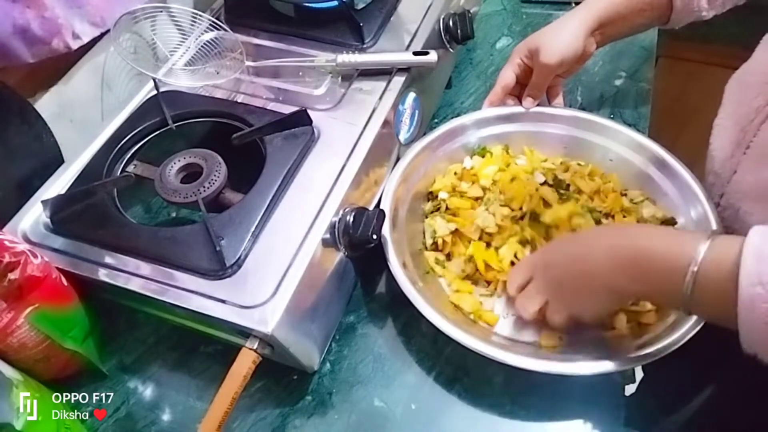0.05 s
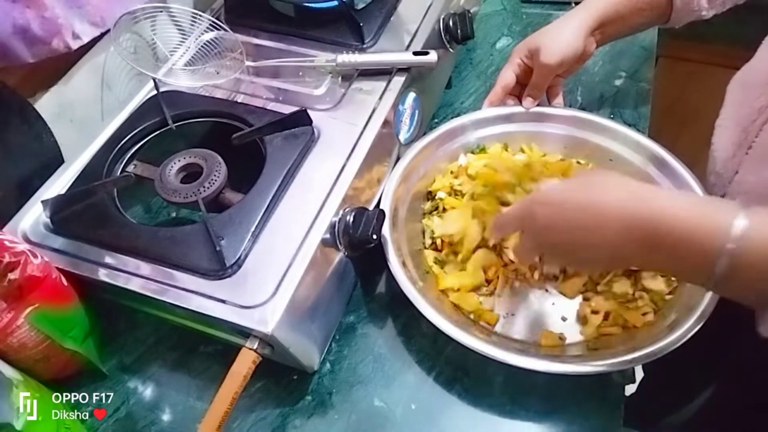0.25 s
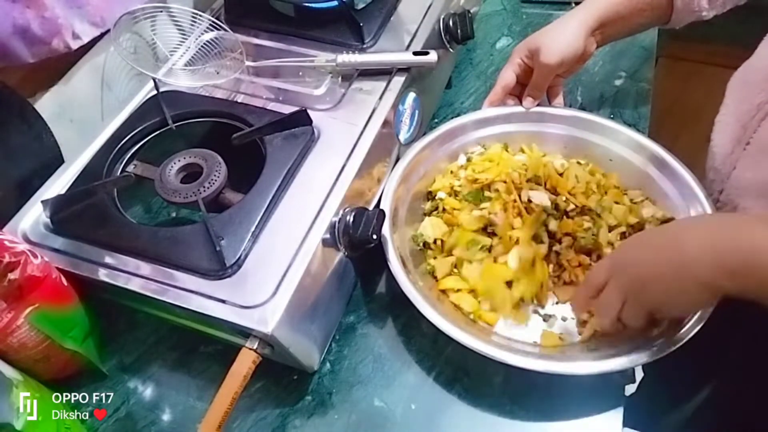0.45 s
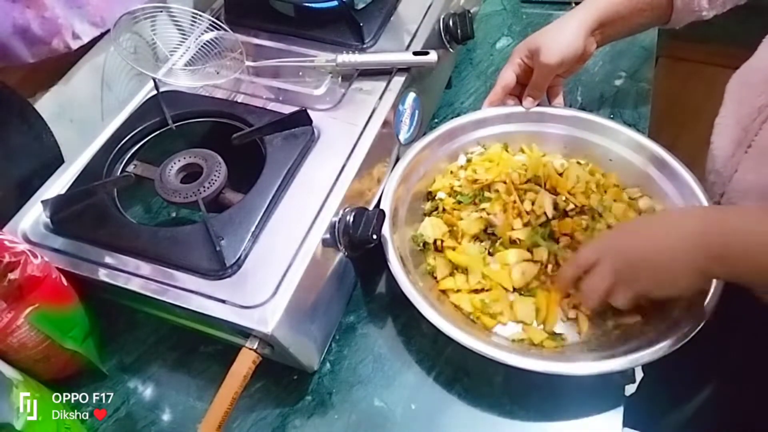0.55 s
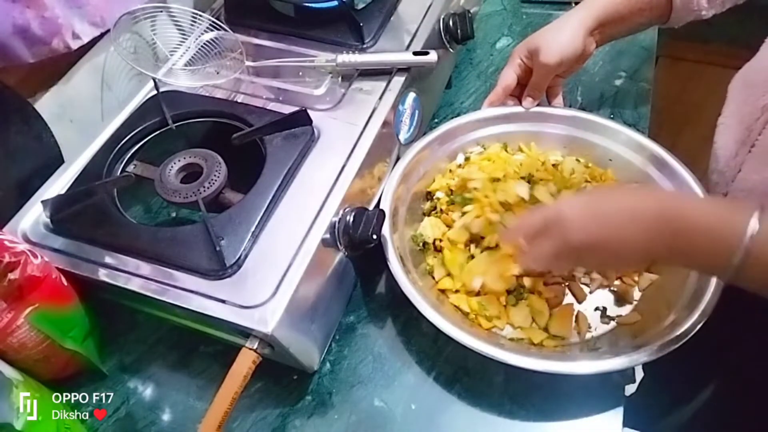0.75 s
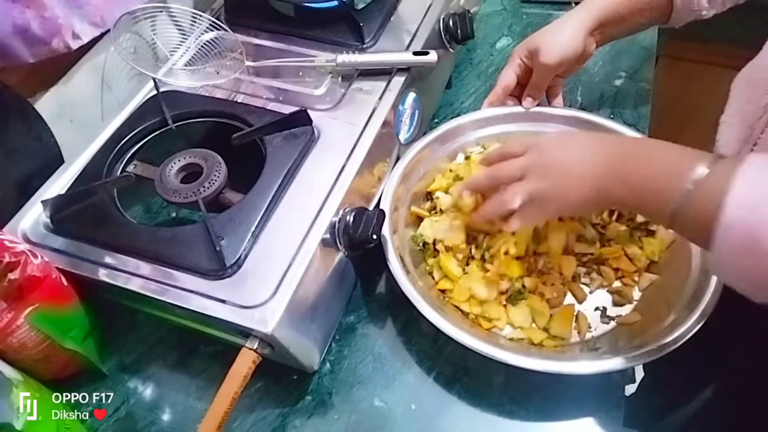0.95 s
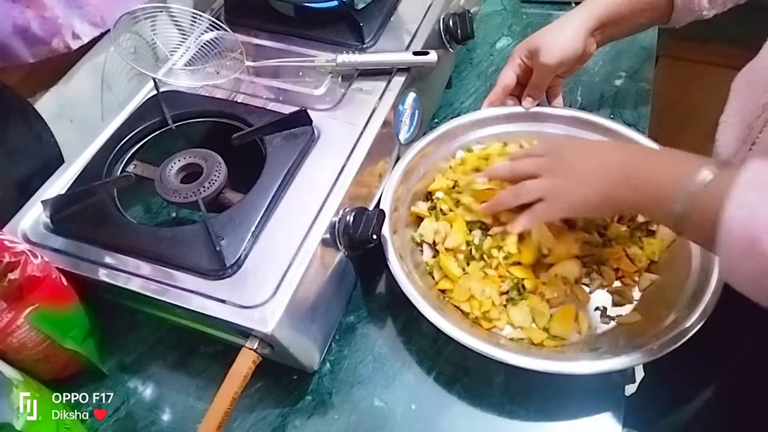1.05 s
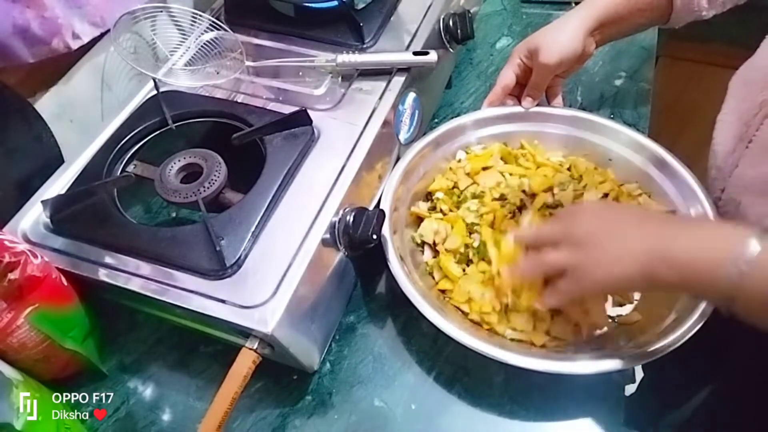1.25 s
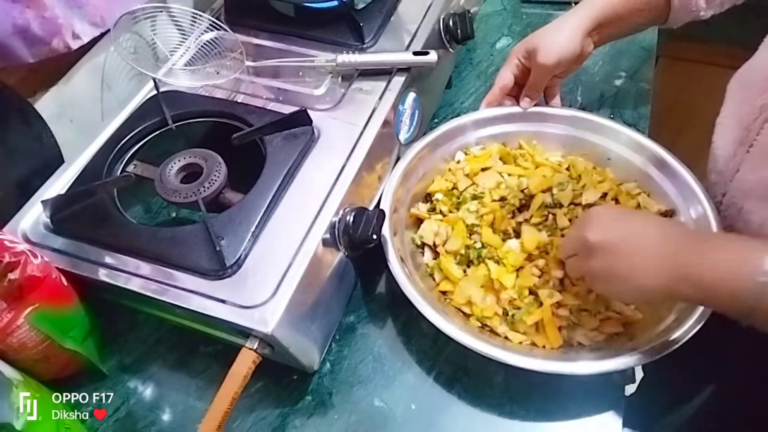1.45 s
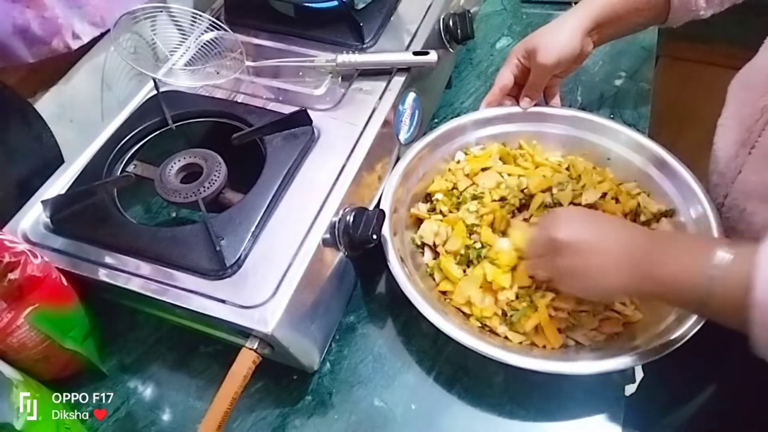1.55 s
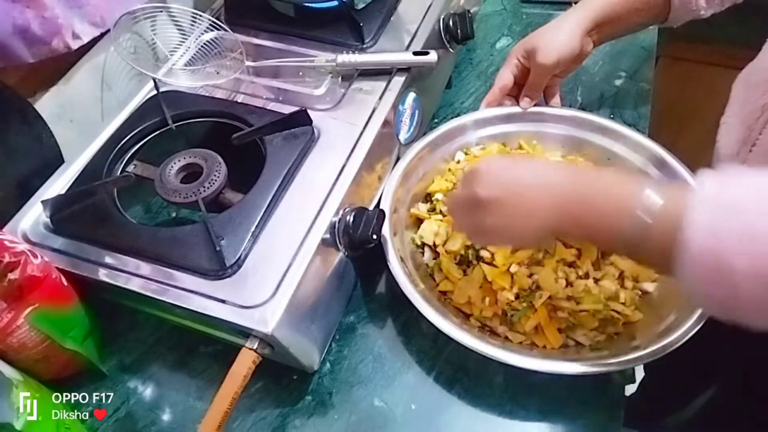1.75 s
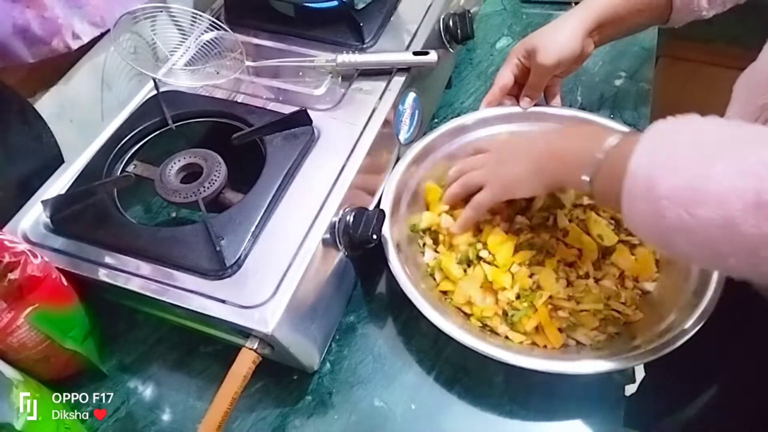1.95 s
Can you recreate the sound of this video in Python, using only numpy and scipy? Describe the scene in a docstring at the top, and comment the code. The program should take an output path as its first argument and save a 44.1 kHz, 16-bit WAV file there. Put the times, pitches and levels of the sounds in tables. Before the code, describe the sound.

Crisp chopped vegetables rustle, crunch and snap as a hand mixes them in a steel bowl. Fingers knock the bowl, which rings briefly and rumbles on the counter, close to the microphone in a small kitchen.

```python
"""On a kitchen counter, close to a phone, a hand turns crisp chopped vegetables in a wide steel bowl.
The pieces rustle as they slide, crunch when crushed or dropped, and now and then snap.
Fingers knock the loaded bowl, which rings briefly, and it rumbles as it shifts on the counter.
The small, hard room echoes over a faint hum; the right microphone opening resonates in the treble."""
import sys
import numpy as np
from scipy import signal
from scipy.fft import rfft, irfft
from scipy.io import wavfile

SR = 44100
rng = np.random.default_rng(int(sys.argv[2]) if len(sys.argv) > 2 else 0)


def bounce(signal):
    """Save signal as a 16-bit WAV file at the path given by the first command-line argument."""
    frames = np.transpose(np.atleast_2d(signal))
    limited = np.clip(frames, -1, 1)
    pcm = np.round(limited * 32767).astype(np.int16)
    wavfile.write(sys.argv[1], SR, pcm)


N = 88200

# tone of the still air (f/Hz, gain/dB)
AIR_TONE = [(20, 5), (45, 13), (70, -30), (110, 1), (250, 0.5), (400, -4.5), (700, -8), (2000, -18),
            (5000, -38), (9000, -30.5), (15500, -11.5)]
# how loud the hum is (t/s, level/dB)
HUM_LOUDNESS = [(0, -68), (.15, -65.5), (1.0, -68), (1.35, -72), (1.48, -57), (1.65, -64.5), (1.75, -69),
                (2, -54.5)]
# how loud the rumble is (t/s, level/dB)
RUMBLE_LOUDNESS = [(0, -49.5), (.08, -66), (.2, -61), (.28, -56), (.33, -49.5), (.45, -52.5), (.60, -51),
                   (.68, -62), (.9, -63.5), (1.1, -64), (1.35, -63), (1.45, -62.5), (1.6, -73),
                   (1.765, -70), (1.785, -41), (1.83, -55.5), (1.90, -54), (2, -61)]
# low notes of the bowl on the counter (f/Hz, level/dB, time to fade by 60 dB/s)
COUNTER_NOTES = [(98, 0, 0.34), (122, -2, 0.71), (138.3, 4, 0.35), (207, -1, 0.1), (239.7, -10.5, 0.45),
                 (339.6, -5.5, 0.048)]
# notes of the loaded bowl (f/Hz, level/dB, time to fade by 60 dB/s, left over right/dB)
BOWL_NOTES = [(135, -6, 0.19, 14), (234.4, 8, 0.19, -1.5), (341, 2.5, 0.23, -0.5), (447, 0, 0.14, 10.5),
              (479.7, 0.5, 0.43, 13), (534.8, 7.5, 0.29, -1), (652, -1.5, 0.22, -1), (723.5, -1, 0.15, 18),
              (773.4, -19.5, 0.31, 28), (878, -4, 0.1, -13), (1059, -3, 0.75, -16.5),
              (1145, -5.5, 0.26, 19), (1584, 2, 0.16, 1.5), (1667, -1.5, .14, 10), (1750, -2.5, 0.15, 10)]
# bright notes of the steel under sliding pieces (f/Hz, level/dB, time to fade by 60 dB/s)
STEEL_NOTES = [(7996, -6, 0.12), (8236, -5, 0.2), (8734, 0, 0.25), (9055, -1, 0.15), (9386, -5, 0.2),
               (9969, -5, .15)]
# fingers hit the bowl (t/s, level/dB, rattle/s, treble cutoff/Hz, favoured pitch/Hz, smothering/s)
FINGER_KNOCKS = [(0.035, -55, 0.03, 1780, 612, 0.11), (0.123, -63.5, 0.011, 595, 328, 0.018),
                 (0.293, -51, 0.02, 1480, 457, 0.043), (0.3178, -43.5, 0.0021, 2420, 1150, 0.017),
                 (0.3227, -38.5, 0.017, 1000, 455, 0.027), (0.3211, -40.5, 0.011, 3200, 1615, .03),
                 (.347, -44, 0.014, 2800, 1580, 0.075), (0.361, -47.5, 0.011, 5000, 2200, 0.0062),
                 (.369, -43.5, .01, 780, 333, 0.035), (0.446, -48.5, 0.0055, 1850, 1463, 0.034),
                 (0.5787, -49.5, 0.005, 1970, 1550, 0.0085), (.581, -47, .008, 1330, 578, 0.1),
                 (.585, -39, 0.018, 1310, 736, 0.042), (.812, -53, 0.0033, 575, 501, 0.034),
                 (.934, -59, 0.087, 2010, 803, 0.024), (1.204, -56, 0.0069, 520, 457, 0.021),
                 (1.216, -51, 0.0017, 800, 736, 0.022), (1.231, -49, 0.017, 1490, 493, 0.036),
                 (1.232, -60, 0.0079, 2500, 1720, 0.018), (1.251, -49.5, 0.0039, 640, 512, 0.017),
                 (1.776, -54, 0.027, 990, 436, 0.054), (1.800, -54, 0.0092, 1290, 535, 0.032),
                 (1.817, -54, 0.01, 1100, 480, 0.037), (1.87, -61.5, 0.018, 1100, 433, .03)]
# tone of the dull part of a knock (f/Hz, gain/dB)
THUD_TONE = [(40, -51), (100, -24), (270, -13.5), (450, -1.5), (750, 2), (1100, 1.5), (2300, -7.5),
             (4000, -13), (8000, -21)]
# how hard the hand stirs (t/s, rustle level/dB)
STIR_EFFORT = [(0, -55), (.04, -56), (.08, -68), (.16, -75), (.28, -61.5), (.31, -51), (.43, -57),
               (.50, -55.5), (.57, -54.5), (.62, -67.5), (.66, -67), (.85, -71.5), (.98, -64), (1.04, -65),
               (1.10, -61), (1.19, -70.5), (1.25, -64), (1.30, -73.5), (1.38, -64), (1.48, -69),
               (1.57, -78.5), (1.77, -76), (1.80, -55), (1.88, -59.5), (2.0, -54.5)]
# tone of the rustling and crunching pieces (f/Hz, gain/dB)
PIECES_TONE = [(100, -17.5), (400, 4.5), (900, 0), (1300, -4), (1620, 2.5), (2200, -0.5), (3300, 2),
               (4500, 1.5), (6500, 0), (9000, -7), (12000, -11), (15500, 0)]
# handfuls crushed or dropped (t/s, level/dB, decay/s, treble tilt/dB per octave)
HANDFULS = [(0.181, -56.5, 0.0039, 2), (0.2908, -40.5, 0.0099, 0), (.3204, -60, 0.0027, -1),
            (0.3401, -40.5, 0.0077, 2), (.432, -46, 0.023, 1.5), (0.5755, -45, 0.0028, 25),
            (0.579, -45, 0.017, -5), (0.932, -63.5, 0.0096, -1.5), (1.232, -55.5, 0.015, -1),
            (1.278, -60.5, 0.0039, 9), (1.3137, -49.5, 0.026, 3), (1.462, -54, 0.012, 6),
            (1.504, -62.5, 0.0056, 6), (1.782, -52, 0.019, -1), (1.97, -55.5, 0.036, -1.5)]
# pieces that snap (t/s, level/dB, f/Hz, pitch spread/Hz, left over right/dB, splintering/s)
SNAPPING_PIECES = [(0.24, -49, 10500, 2700, 2.5, 0.0029), (0.3753, -41.5, 8970, 2730, 5.5, 0.015),
                   (0.671, -51, 13250, 3030, 2.5, 0.012), (0.737, -46.5, 6940, 1930, -0.5, 0.015),
                   (.968, -72.5, 9600, 3030, 2, 0.00095), (1.795, -57.5, 6100, 1200, -7, 0.01)]
# tone of the left microphone opening (f/Hz, gain/dB)
LEFT_MIC_TONE = [(100, -11), (200, -12), (400, 0.5), (800, -2), (1600, 0), (4000, -7.5), (7000, -10.5),
                 (9000, -3), (13000, 5), (15500, -14)]
# tone of the right microphone opening (f/Hz, gain/dB)
RIGHT_MIC_TONE = [(100, -9.5), (200, -5), (400, 0), (1600, 3.5), (3000, -0.5), (5000, 1), (7000, 6),
                  (8000, 14.5), (8850, 21.5), (9700, 18), (12000, 13.5), (15500, 3)]

HUM_HZ, AIR_DB = 209.5, -68
ROOM_HIGH_DB, ROOM_LOW_DB, ROOM_HIGH_FADE_S, ROOM_LOW_FADE_S, ROOM_GAP_S = 0.5, -2.5, 0.16, 0.28, 0.0089
BOWL_ECHO_DB, BOWL_ECHO_S, TURNS_PER_S = 3, 0.0041, 1.343
THUD_DB, RATTLE_DB, KNOCK_ROOM_DB = -4, -12.5, -2
SPOT_DB, SPOT_OCTAVES = 11.5, 0.16  # boost and reach around a knock's favoured pitch
SWELL_S = 0.0011  # the ring builds up while the finger presses
RING_S = 0.034  # a knock smothered sooner than this is more thud than ring
RUSTLE_APART = 0.96  # share of the rustle's power that reaches one side only
DRAG_DB, STEEL_DB = -25.5, -24  # the bowl's low and bright ring under the pieces
ATTACK_S = 0.00074  # a handful gives way over this time
SPLINTER_DB, CRACK_DB = 3.5, -8.5


def undb(db):
    """Turn decibels into a factor to multiply by."""
    return 10 ** (np.asarray(db) / 20)


def unit(x):
    """Scale a sound to an energy of one."""
    return x / np.sqrt(np.sum(x ** 2, axis=-1, keepdims=True) + 1e-20)


def clock():
    """The time of each sample in seconds."""
    return np.arange(N) / SR


def curve(points):
    """A volume curve through (t/s, level/dB) points."""
    return undb(np.interp(clock(), *np.array(points).T))


def conv(x, response):
    """Let every sample of x set off a ring or an echo."""
    return signal.fftconvolve(x, response)[:N]


def colour(x, points, size=4096):
    """Shape the tone of a sound through (f/Hz, gain/dB) points."""
    hz, db = np.array(points, float).T
    log_hz = np.log(np.arange(size // 2 + 1) * SR / size + 1)
    cepstrum = irfft(np.log(undb(np.interp(log_hz, np.log(hz), db))))
    # folding it in half keeps the filter from answering before the sound arrives
    cepstrum[1:size // 2] *= 2
    cepstrum[size // 2 + 1:] = 0
    return conv(x, irfft(np.exp(rfft(cepstrum))))


def fade(fade_s):
    """Die away by 60 dB in the given time."""
    return np.exp(-np.log(1000) * clock() / fade_s)


def ring(notes):
    """A struck object sounds several fading notes at once."""
    return unit(sum((-1) ** k * undb(db) * unit(fade(fade_s) * np.sin(2 * np.pi * hz * clock()))
                    for k, (hz, db, fade_s) in enumerate(notes)))


def late(x, start_s):
    """Start a sound at the given time."""
    return np.concatenate([np.zeros(max(int(start_s * SR), 0)), x])[:N]


def event(x, db):
    """Give a short sound the energy of 10 ms at this level."""
    return x / np.sqrt(np.mean(x ** 2) * N + 1e-20) * undb(db) * np.sqrt(SR / 100)


def grains(per_s, spread_db):
    """Tiny clicks of unequal size at random times."""
    sizes = undb(spread_db * np.minimum(rng.exponential(size=N), 4))
    hits = rng.random(N) < per_s / SR
    return unit(hits * sizes * rng.choice([-1, 1], N)) * np.sqrt(N)


def sliding():
    """Things that rub make dense, even clicks."""
    return grains(per_s=3500, spread_db=1.5)


def burst(clicks, decay_s):
    """A cluster of clicks swells quickly and dies away."""
    t = clock()
    return unit(clicks * (1 - np.exp(-t / ATTACK_S)) * np.exp(-t / decay_s))


def background():
    """Still air and a faint, wavering hum."""
    hum = curve(HUM_LOUDNESS) * np.sin(2 * np.pi * HUM_HZ * clock())
    middle, side = (unit(colour(rng.standard_normal(N), AIR_TONE)) for _ in range(2))
    side = colour(side, [(150, 2), (1500, -1.0)])
    return hum + undb(AIR_DB) * np.sqrt(N / 2) * np.array([middle + side, middle - side])


def rumble():
    """The pressed bowl shifts on the counter and sets off low notes."""
    return conv(sliding() * curve(RUMBLE_LOUDNESS), ring(COUNTER_NOTES))


def walls():
    """The small kitchen echoes after a short gap; the bass lasts longest."""
    noise = rng.standard_normal(N)
    high = undb(ROOM_HIGH_DB) * unit((noise - lowpass(noise, hz=1130)) * fade(ROOM_HIGH_FADE_S))
    low = undb(ROOM_LOW_DB) * lowpass(unit(noise * fade(ROOM_LOW_FADE_S)), hz=674)
    return late(colour(high, [(500, -9), (2500, -2.0)]) + low, ROOM_GAP_S)


def lowpass(x, hz):
    """Muffle the sound above this pitch."""
    return signal.sosfilt(signal.butter(2, hz, fs=SR, output="sos"), x)


def echoes():
    """Sound bounces quickly inside the bowl, then off the walls."""
    bounces = unit(rng.standard_normal(N) * np.exp(-clock() / BOWL_ECHO_S))
    return undb(BOWL_ECHO_DB) * colour(bounces, [(700, -15.0), (4000, 1)]) + walls()


def stirred(x):
    """The hand circles past eight places in the bowl, each with its own echoes."""
    places = np.arange(8)[:, None] / 8
    nearness = np.maximum(np.cos(2 * np.pi * (TURNS_PER_S * clock() - places)), 0) ** 8
    shares = nearness / np.sqrt(np.sum(nearness ** 2, axis=0))
    return x + sum(conv(x * share, echoes()) for share in shares)


def knocks():
    """A finger rings the bowl, then smothers it while pieces rattle; each spot favours some notes."""
    out, t = np.zeros((2, N)), clock()
    hz, note_db, _, pan_db = np.array(BOWL_NOTES).T
    notes = np.array([(-1) ** k * ring([note[:3]]) for k, note in enumerate(BOWL_NOTES)])
    for start_s, db, rattle_s, cutoff_hz, spot_hz, smother_s in FINGER_KNOCKS:
        boost_db = SPOT_DB * np.exp(-(np.log2(hz / spot_hz) / SPOT_OCTAVES) ** 2)
        gains = unit(undb(note_db + boost_db))
        touch = (1 - np.exp(-t / SWELL_S)) * np.exp(-(t / smother_s) ** 2)
        rings = (gains * undb(np.array([pan_db, -pan_db]) / 2)) @ notes * touch
        rings /= np.linalg.norm(gains @ notes * np.exp(-t / RING_S))
        sides = []
        for bowl in rings:
            rattle = burst(sliding(), rattle_s)
            thud = undb(THUD_DB) * unit(colour(rattle, THUD_TONE))
            sides.append(lowpass(bowl + undb(RATTLE_DB) * conv(rattle, bowl) + thud, cutoff_hz))
        out += np.array([late(side, start_s) for side in event(np.array(sides), db)])
    return out


def rustle():
    """Pieces slide over each other all across the bowl, so left and right differ."""
    shared = np.sqrt(1 - RUSTLE_APART) * sliding()
    return [(shared + np.sqrt(RUSTLE_APART) * sliding()) * curve(STIR_EFFORT) for _ in range(2)]


def crunches():
    """A handful gives way in a burst of tiny breaks, duller or brighter."""
    out = 0
    for start_s, db, decay_s, tilt_db in HANDFULS:
        breaks = burst(grains(per_s=1800, spread_db=3), decay_s)
        crunch = colour(breaks, [(2000, -2 * tilt_db), (16000, tilt_db)])
        out = out + late(event(crunch, db), start_s)
    return out


def snaps():
    """A piece breaks with a very short, high ping, struck again as it splinters."""
    out, t, click = 0, clock(), signal.unit_impulse(N)
    crack = undb(CRACK_DB) * unit(colour(click, [(3000, -47), (7000, 0.0), (14000, -8)]))
    for start_s, db, hz, spread_hz, pan_db, splinter_s in SNAPPING_PIECES:
        ping = unit(t ** 2 * np.exp(-np.pi * spread_hz * t) * np.sin(2 * np.pi * hz * t))
        splinters = undb(SPLINTER_DB) * unit(rng.standard_normal(N) * np.exp(-t / splinter_s))
        snap = event(conv(click + splinters, crack + ping), db)
        out = out + late(snap, start_s) * undb(np.array([[pan_db], [-pan_db]]) / 2)
    return out


def scene():
    """Pieces and fingers sound in the bowl and the kitchen, over rumble, hum and still air."""
    crunch, sides = crunches(), []
    bowl = ring([note[:3] for note in BOWL_NOTES])
    for rub, snap, knock in zip(rustle(), snaps(), knocks()):
        pieces = colour(rub + crunch, PIECES_TONE)
        steel = undb(DRAG_DB) * conv(rub, bowl) + undb(STEEL_DB) * conv(pieces, ring(STEEL_NOTES))
        inside = stirred(pieces + steel + snap)
        # knocks leave the outside of the bowl, so they arrive with less echo
        outside = knock + undb(KNOCK_ROOM_DB) * conv(knock, walls())
        sides.append(inside + outside)
    return np.array(sides) + rumble() + background()


def record(dry):
    """Each microphone opening colours its side; the treble above 15800 Hz is cut."""
    heard = np.array([colour(dry[0], LEFT_MIC_TONE), colour(dry[1], RIGHT_MIC_TONE)])
    return signal.sosfilt(signal.ellip(10, .2, 70, 15800, fs=SR, output="sos"), heard)


dry = scene()
out = record(dry)
bounce(out)
```